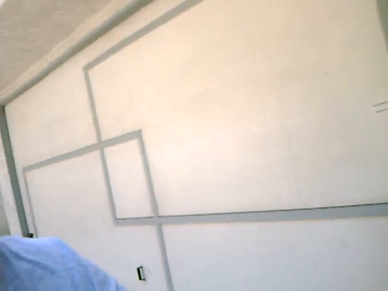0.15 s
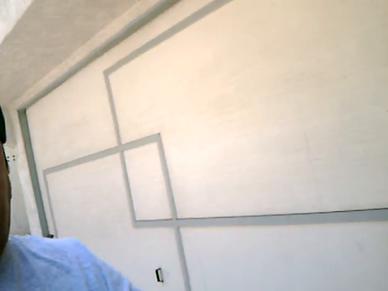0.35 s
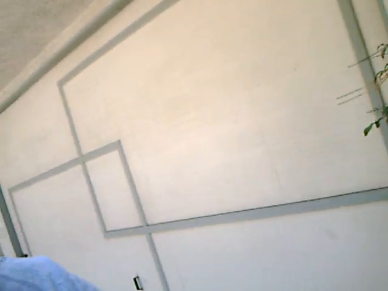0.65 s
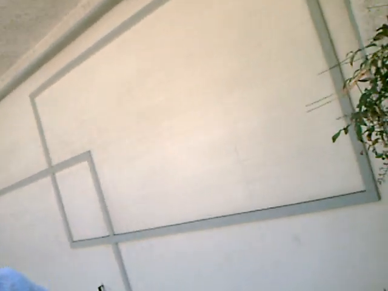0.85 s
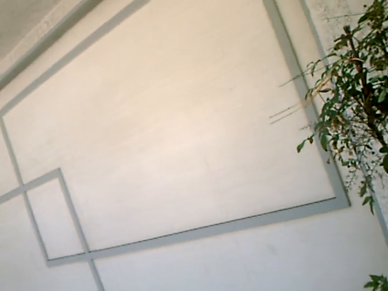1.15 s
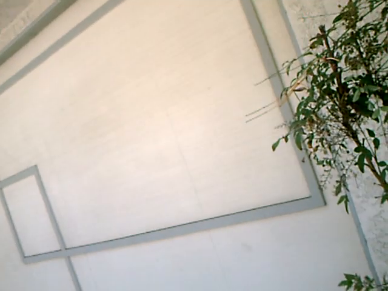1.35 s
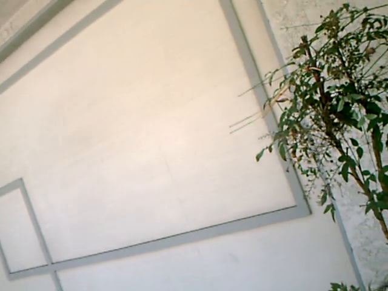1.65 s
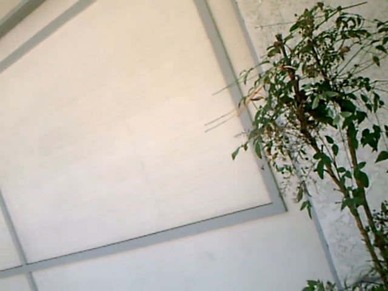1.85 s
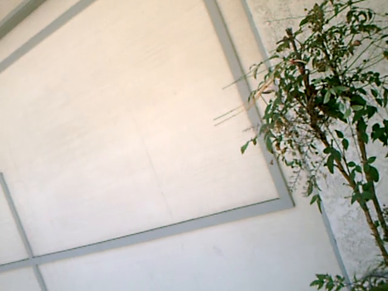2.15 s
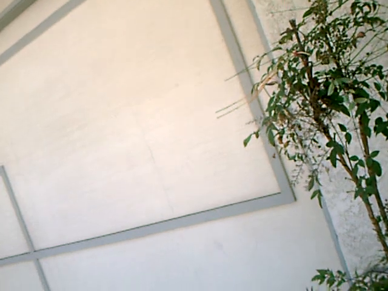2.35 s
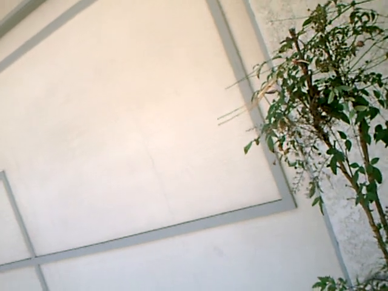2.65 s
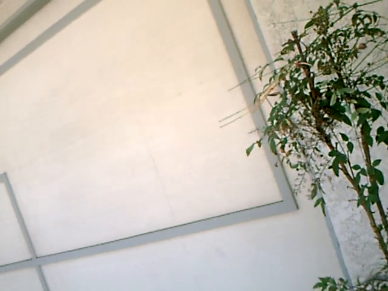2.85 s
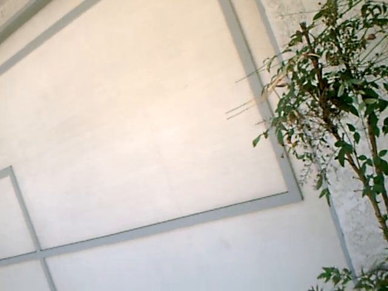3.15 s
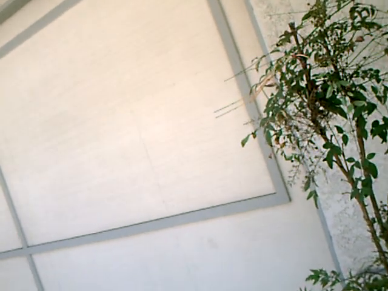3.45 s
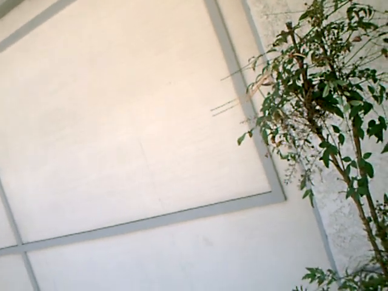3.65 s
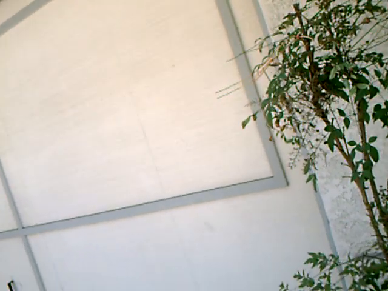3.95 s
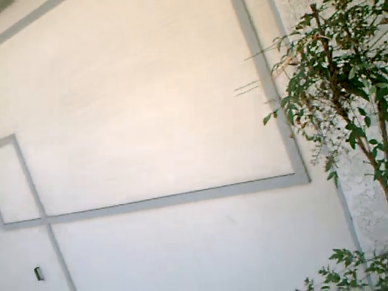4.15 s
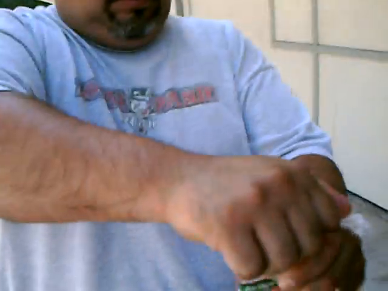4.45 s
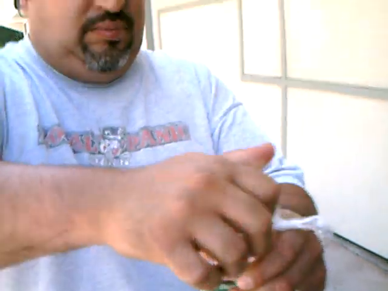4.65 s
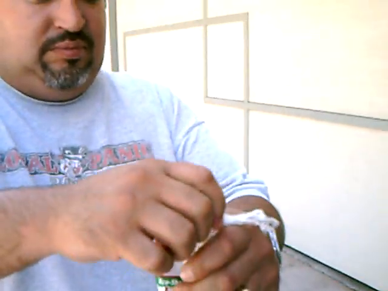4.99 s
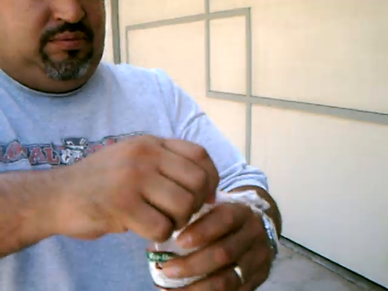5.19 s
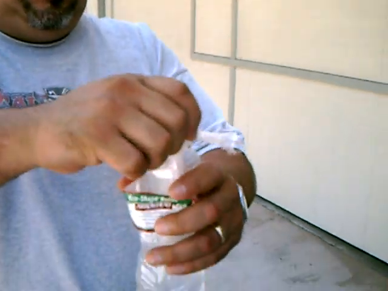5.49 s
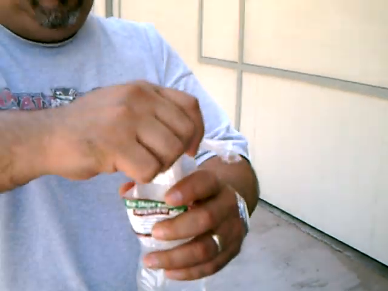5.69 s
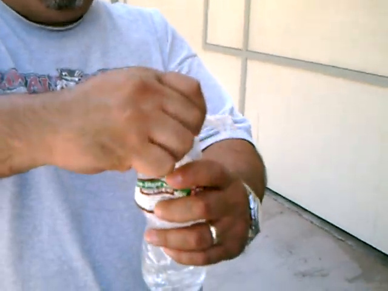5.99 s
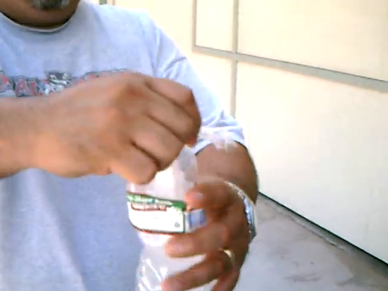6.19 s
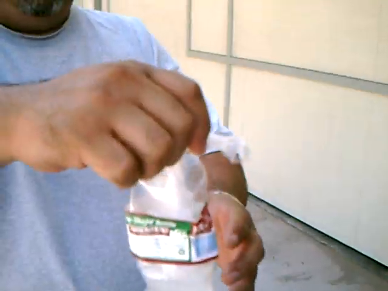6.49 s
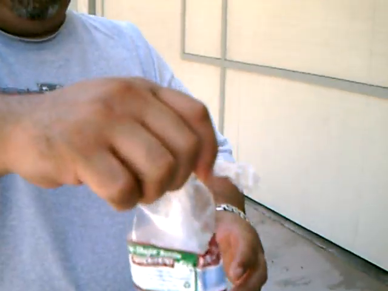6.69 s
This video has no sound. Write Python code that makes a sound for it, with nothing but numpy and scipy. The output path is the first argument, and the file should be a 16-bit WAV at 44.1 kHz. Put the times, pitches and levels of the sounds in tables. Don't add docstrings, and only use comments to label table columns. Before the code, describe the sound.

Thin plastic bottle snaps and crackles sharply close up in bursts, with faint wrap rustle, over low distant traffic rumble in a paved yard.

```python
import sys
import numpy as np
from scipy import signal
from scipy.fft import rfft, irfft
from scipy.io import wavfile
from scipy.ndimage import uniform_filter1d

SR = 44100
rng = np.random.default_rng(int(sys.argv[2]) if len(sys.argv) > 2 else 0)


def store_wav(level_fs):
    pcm = np.round(np.clip(np.atleast_2d(level_fs), -1, 1) * 32767)
    wavfile.write(sys.argv[1], SR, pcm.T.astype(np.int16))


def boost(x):
    u = np.asarray(x, float) / 20
    return 10 ** u


N = 301203


def colour(table):
    hz, db = np.transpose(table)
    bins = np.maximum(np.fft.rfftfreq(N, 1 / SR), 1)
    gain = boost(np.interp(np.log(bins), np.log(hz), db))
    x = irfft(rfft(rng.standard_normal(N)) * gain, N)
    return x / x.std()


def band(x, low_hz, high_hz):
    return signal.sosfilt(signal.butter(2, [low_hz, high_hz], "band", fs=SR, output="sos"), x)


def walk(rate_hz):
    hold = int(SR / rate_hz)
    levels = np.repeat(rng.standard_normal(N // hold + 1), hold)
    return 1.9 * uniform_filter1d(uniform_filter1d(levels, hold), hold)[:N]


def curve(table):
    s, value = np.transpose(table)
    return np.interp(np.arange(N) / SR, s, value)


def ring(t, wave, peak_s):
    u = t / peak_s
    return (u * np.exp(1 - u)) ** 1.15 * wave


def ticks(spread_db, share):
    size = boost(spread_db * np.minimum(rng.exponential(size=N), 4))
    return rng.standard_normal(N) * size * (rng.random(N) < share)


# time in seconds, level in dB.
TYRE_LEVEL = [(0.0, -52.5), (0.75, -46), (1.2, -53), (1.4, -51), (3.5, -50), (4.2, -52.5), (4.6, -48),
              (5.1, -51.5), (5.75, -48), (6.3, -49.5), (6.83, -50.5)]
# frequency in Hz, density in dB.
RUMBLE_SPECTRUM = [(12, -34), (20, -14), (54, -3), (145, -13.5), (208, -16), (258, -20.5), (300, -20),
                   (377, -24), (500, -29.5), (650, -39), (1100, -120)]
# frequency in Hz, density in dB.
ROAR_SPECTRUM = [(300, -22), (550, -3.5), (800, 1.5), (1100, -3), (1600, -10), (2200, -16), (3500, -16.5),
                 (5500, -21.5), (7000, -12.5)]


def traffic():
    rumble_db = -37.5 + 6.5 * np.exp(-np.arange(N) / SR / 0.46)
    engine_hz = 58.1 * (1 + 0.071 * walk(9))
    note = np.sin(2 * np.pi * np.cumsum(engine_hz) / SR)
    rumble = colour(RUMBLE_SPECTRUM) * boost(-1.0) + boost(-4 + 0.79 * walk(8.7)) * note
    roar = colour(ROAR_SPECTRUM) * boost(curve(TYRE_LEVEL) + 2 + 1.2 * walk(5))
    return rumble * boost(rumble_db) + roar


# time in seconds, level in dB.
RUSTLE_LEVEL = [(0.0, -62), (0.21, -54), (0.93, -56.5), (1.15, -56.5), (1.5, -54), (1.81, -55), (2.02, -61),
                (2.4, -58), (3.01, -63), (3.12, -48.5), (3.44, -61.5), (5.14, -62.5), (6.22, -62),
                (6.83, -62.5)]


def wrap():
    tick = ticks(3.3, .15)
    resonance = 0.8 * band(tick, 3750, 5790) + 0.2 * band(tick, 4100, 4500)
    film = resonance + band(tick, 1300, 6000)
    return film / film.std() * boost(curve(RUSTLE_LEVEL) + 1.5 * walk(35))


# start in seconds, level in dB, note in Hz.
GRIP_JOLTS = [(0.042, -18, 269), (.052, -27, 332), (0.066, -28, 275), (0.076, -32, 210), (0.101, -30, 278),
              (.57, -30, 204), (1.586, -30, 334), (2.71, -28, 547), (3.15, -23.5, 540), (4.577, -31.5, 424),
              (6.026, -29, 326)]


def jolts():
    out, t = np.zeros(N + 4096), np.arange(4096) / SR
    for s, db, hz in GRIP_JOLTS:
        start = int(s * SR)
        out[start:start + len(t)] += boost(db) * ring(t, np.sin(2 * np.pi * hz * t), 0.95 / hz)
    return out[:N]


# start in seconds, panel level in dB,
# panel note in Hz, tearing level in dB, crease level in dB.
FOLD_FLIPS = [(0.0435, -5.5, 735, -10, -12.5), (0.1382, -20, 1040, -28, -15.5),
              (0.1395, -19.5, 1010, -20, -29), (0.1502, -21.5, 1820, -8.5, -18),
              (0.3303, -28, 1195, -24.5, -34), (.3339, -23, 803, -26.5, -29.5),
              (.665, -20, 890, -32, -32.5), (.674, -28.5, 814, -28, -50), (0.718, -33, 870, -26, -20),
              (0.7886, -6.5, 917, -21, -20), (1.1958, -9, 946, -21, -14.5), (1.302, -35.5, 1760, -43, -30),
              (1.3224, -16.5, 1635, -40, -16), (2.3029, -21.5, 1280, -41, -31.5),
              (2.6798, -32, 1220, -34, -27.5), (2.799, -28.5, 1160, -47, -41),
              (3.0916, -28, 850, -30.5, -29), (3.123, -28, 1190, -35, -38), (4.4984, -16.5, 1007, -37, -27),
              (4.5752, -14, 1340, -11.5, -15), (5.9393, -10.5, 940, -15, -19.5),
              (6.024, -17, 914, -22, -32), (6.0259, -21.5, 893, -20, -35), (6.1289, -19, 990, -32, -43)]
# start in seconds, panel level in dB,
# crease level in dB.
CAP_TICKS = [(0.0463, -8.5, -15.5), (0.3722, -22, -27), (0.7086, -28.5, -22.5), (1.1836, -24.5, -33),
             (1.2897, -35, -28.5), (1.4675, -49.5, -46), (1.8745, -26, -23), (1.991, -38, -28),
             (2.0005, -31.5, -31.5), (2.0228, -38.5, -28), (3.8193, -17.5, -28.5)]
# start in seconds, panel level in dB, panel note in Hz.
PANEL_POPS = [(.0796, -28, 507), (1.1028, -30, 910), (1.1699, -16.5, 930), (1.204, -34, 1010),
              (1.4069, -28.5, 990), (1.4974, -29.5, 1020), (1.5195, -25, 1246), (2.0081, -33, 920),
              (2.0754, -31, 1090), (2.1256, -21.5, 946), (2.3418, -26.5, 860), (2.612, -30.5, 584),
              (2.711, -23.5, 1445), (2.8028, -41, 1210), (2.8351, -18, 1020), (2.992, -40, 1090),
              (4.5044, -18, 1555)]
# start in seconds, panel level in dB,
# panel note in Hz, tearing level in dB, crease level in dB.
CREASE_CRACKS = [(0.1255, -6.5, 827, -13, -15), (0.2962, -4.5, 1154, -7, -13),
                 (0.5698, -18, 910, -19.5, -19), (0.7344, -22.5, 760, -10, -9),
                 (0.7473, -18.5, 1080, -12, -11), (0.7667, -24.5, 1014, -23, -6.5),
                 (1.0638, -17.5, 990, -19, -10), (1.1151, -26, 980, -14, -10),
                 (1.1913, -21.5, 1020, -14.5, -16.5), (1.249, -15.5, 1160, -37, -15.5),
                 (1.3153, -17.5, 1140, -19.5, -13), (1.3523, -12, 1140, -18.5, -23),
                 (1.509, -18.5, 984, -23, -21.5), (1.585, -8.5, 1054, -24.5, -28),
                 (1.5983, -17, 1120, -12.5, -31), (1.6045, -22, 1690, -14, -6.5),
                 (2.0477, -31.5, 1270, -24, -14), (2.6759, -28, 1330, -26.5, -16.5),
                 (3.1299, -14.5, 850, -4.5, -7), (3.1367, -15.5, 990, -20.5, -20),
                 (3.15, -16, 1222, -16.5, -11.5), (4.578, -17, 1060, -32, -17.5),
                 (4.6008, -2.8, 950, -26, -30), (6.1783, -22.5, 1050, -26.5, -24.5)]


def snap_rows():
    crack_hz, fold_hz, tick_hz = 4698, 3875, 4860
    cracks = [row + (crack_hz,) for row in CREASE_CRACKS]
    folds = [row + (fold_hz,) for row in FOLD_FLIPS]
    cap = [(s, db, 1020, crease_db - 2.5, crease_db, tick_hz) for s, db, crease_db in CAP_TICKS]
    pops = [(s, db, hz, db - 27, db - 25.5, crack_hz) for s, db, hz in PANEL_POPS]
    return cracks + folds + cap + pops


def bottle():
    out, t = np.zeros(N + 4096), np.arange(1024) / SR
    for s, panel_db, panel_hz, tearing_db, crease_db, crease_hz in snap_rows():
        chance = rng.random(7)
        tearing = rng.standard_normal(len(t))
        crack = ring(t, band(tearing, 1800, 3700), .0008)
        sizzle = ring(t, band(tearing, 3500, 6500), .0008)

        crease_hz *= 1 + 0.058 * (2 * chance[6] - 1)
        panel_beside_hz = panel_hz * (1.18 + .3 * chance[0])
        crease_beside_hz = crease_hz * (.85 + .36 * chance[1])
        notes_hz = np.array([panel_hz, panel_beside_hz, crease_hz, crease_beside_hz])
        waves = np.sin(2 * np.pi * (notes_hz[:, None] * t) + 2 * np.pi * chance[2:6, None])

        panel = ring(t, waves[0], 0.00094) + boost(-6.5) * ring(t, waves[1], 0.0008)
        crease = ring(t, waves[2], .00048) + boost(-7) * ring(t, waves[3], .0005)
        crease += boost(-1) * sizzle
        snap = boost(panel_db) * panel + boost(crease_db) * crease
        snap += boost(tearing_db) * crack / np.abs(crack).max()
        start = int((s - .0002) * SR)
        out[start:start + len(t)] += snap
    return out[:N]


# delay in seconds, level in dB, top frequency in Hz.
FLAT_ECHOES = [
    (.0060, -14.5, 6040),
    (0.0094, -18, 2460),
    (.0235, -44, 2500),
    (0.033, -30.5, 2470),
]
# low edge in Hz, high edge in Hz, decay by 60 dB in seconds,
# level in dB.
YARD_TAIL = [
    (500, 2000, 0.82, -26.5),
    (1760, 14000, 0.42, -30),
    (3620, 4900, 0.19, -42),
]


def yard(x):
    t, out = np.arange(SR) / SR, np.zeros(N)
    for delay_s, db, top_hz in FLAT_ECHOES:
        lag = int(delay_s * SR)
        out[lag:] += boost(db) * band(x, 340, top_hz)[:-lag]
    reply = np.zeros(SR)
    for low_hz, high_hz, t60_s, db in YARD_TAIL:
        fade = boost(-60 * t / t60_s) * np.clip(t / 0.011, 0, 1)
        reply += boost(db - 26.5) * band(rng.standard_normal(SR), low_hz, high_hz) * fade
    return out + signal.fftconvolve(x, reply)[:N]


# low edge in Hz, high edge in Hz, decay by 60 dB in seconds, level in dB.
RELAXING_WALL = [
    (480, 1510, 0.33, -30.5),
    (2040, 6200, 0.3, -30.5),
]


def settling(snaps):
    out, tick = np.zeros(N), ticks(4.0, .12)
    for low_hz, high_hz, t60_s, db in RELAXING_WALL:
        fade = boost(-120 / (t60_s * SR))
        power = band(snaps, low_hz, high_hz) ** 2
        stress = np.sqrt(signal.lfilter([1 / 60], [1, -fade], power))
        swarm = band(tick, low_hz, high_hz)
        out[200:] += boost(db) * stress[:-200] * swarm[200:] / swarm.std()
    return out


# start in seconds, end in seconds, level in dB, pitch in Hz.
LABEL_RUBS = [
    (0.141, 0.176, -41, 4200),
    (2.05, 2.297, -53, 4440),
    (2.302, 2.657, -61, 4500),
    (2.903, 2.927, -45, 3700),
    (2.933, 3.009, -45.5, 3720),
    (2.9, 3.003, -45, 1520),
    (3.138, 3.156, -36, 4200),
    (3.15, 3.297, -52, 3920),
    (4.453, 4.553, -51.5, 4100),
]


def fingers():
    out, t = np.zeros(N), np.arange(N) / SR
    grain = rng.standard_normal(N) * boost(2.5 * walk(400))
    for start, end, db, hz in LABEL_RUBS:
        press = np.clip(np.minimum(t - start, end - t) / .012, 0, 1)
        scrape = band(grain, hz * .9, hz * 1.22) + boost(-10) * band(grain, 700, 5800)
        out += boost(db + 8) * press * scrape
    return out


# start in seconds, panel level in dB, panel note in Hz.
SOFT_DENTS = [(0.39, -37, 1100), (0.35, -32.5, 1160), (4.5299, -26, 825), (4.634, -35, 1500),
              (4.6486, -34, 950), (5.967, -27.5, 850), (6.0515, -26.5, 920), (6.114, -40.5, 1200),
              (6.1365, -31, 1100), (6.1278, -36, 2360), (2.348, -34, 800), (2.713, -29, 1150),
              (2.84, -28.5, 1300), (6.186, -32.5, 1100), (3.183, -35, 900)]


def dents():
    out, t = np.zeros(N + 2048), np.arange(2048) / SR
    for s, db, hz in SOFT_DENTS:
        start = int(s * SR)
        out[start:start + len(t)] += boost(db) * ring(t, np.sin(2 * np.pi * hz * t), 0.0018)
    return out[:N]


def scene():
    snaps = jolts() + bottle() + dents()
    return (traffic() + wrap() + snaps + yard(snaps) + settling(snaps) + fingers())[None]


def band_limit(x):
    return signal.sosfilt(signal.butter(12, 15740, fs=SR, output="sos"), x)


def record(dry):
    top_hz, clip_level = 5713, .72
    low_pass = signal.cheby2(12, 70, top_hz * 1.1845, fs=SR, output="sos")
    narrow = signal.sosfilt(low_pass, dry)
    return band_limit(np.clip(narrow, -clip_level, clip_level))


dry = scene()
out = record(dry)
store_wav(out)
```